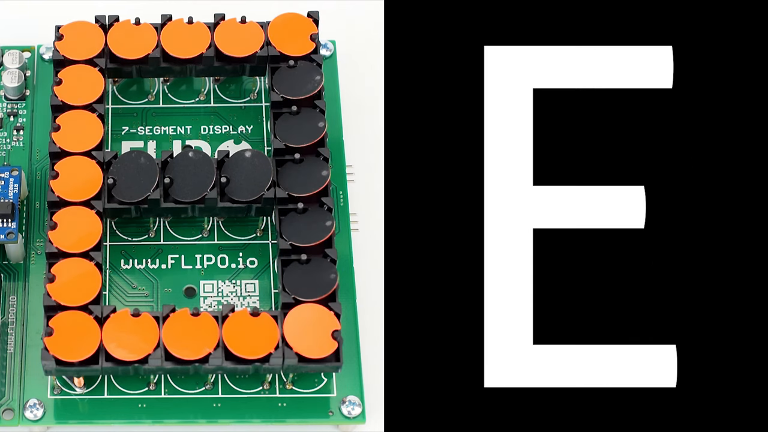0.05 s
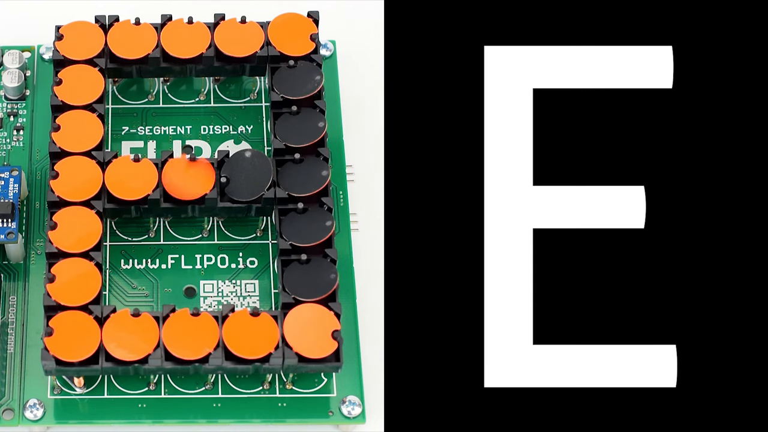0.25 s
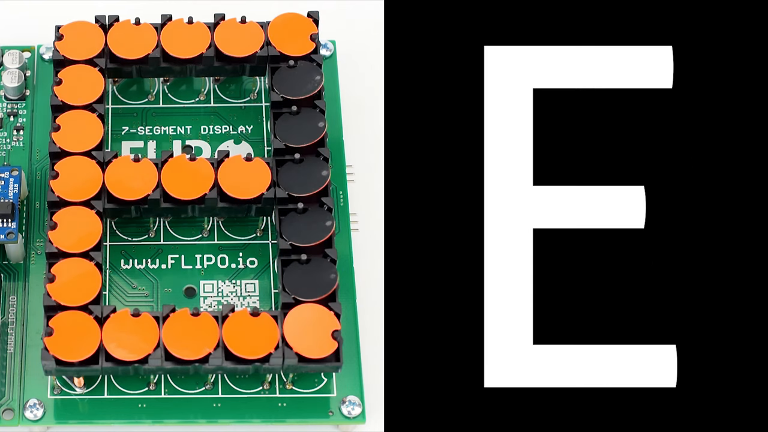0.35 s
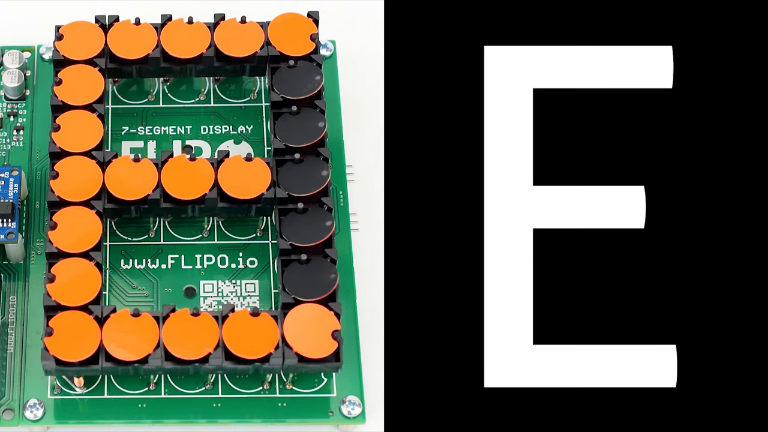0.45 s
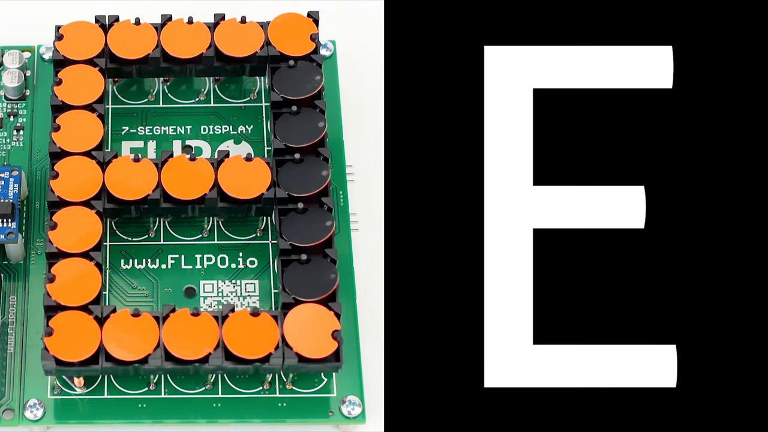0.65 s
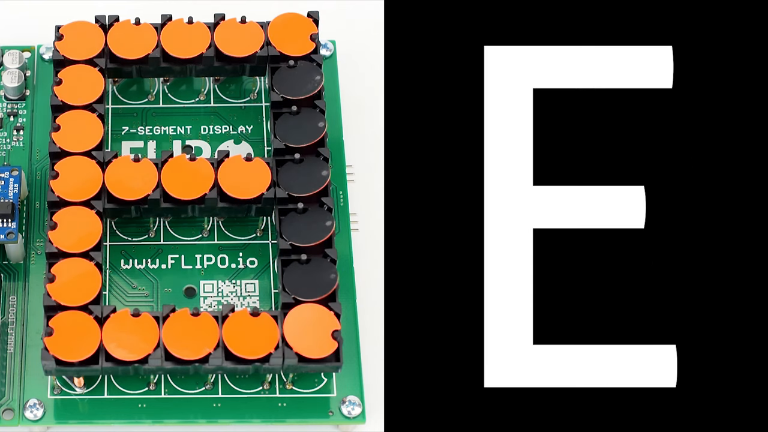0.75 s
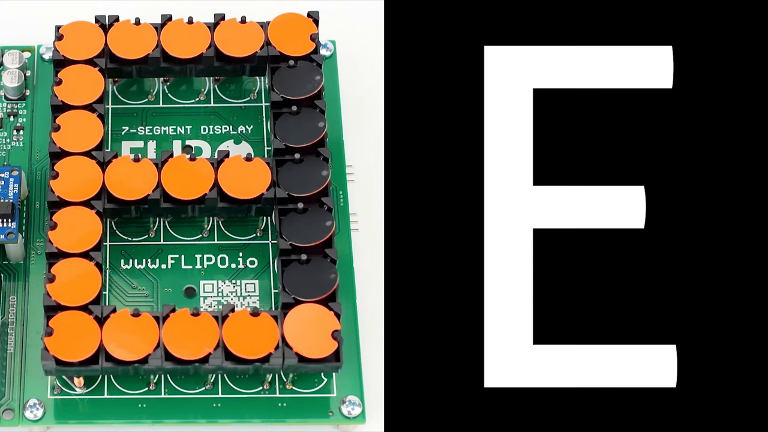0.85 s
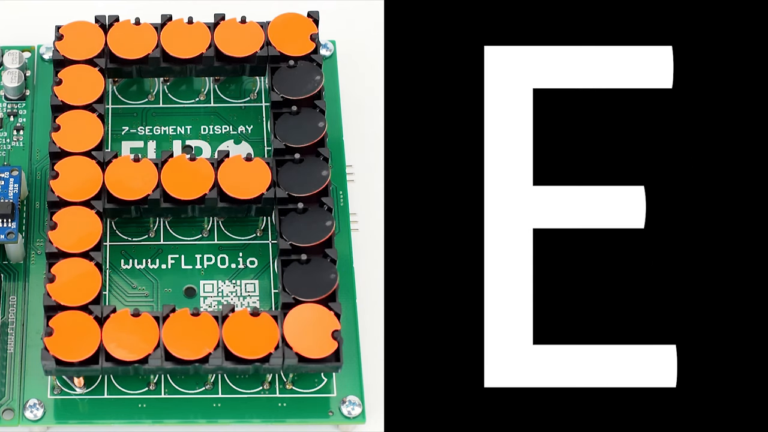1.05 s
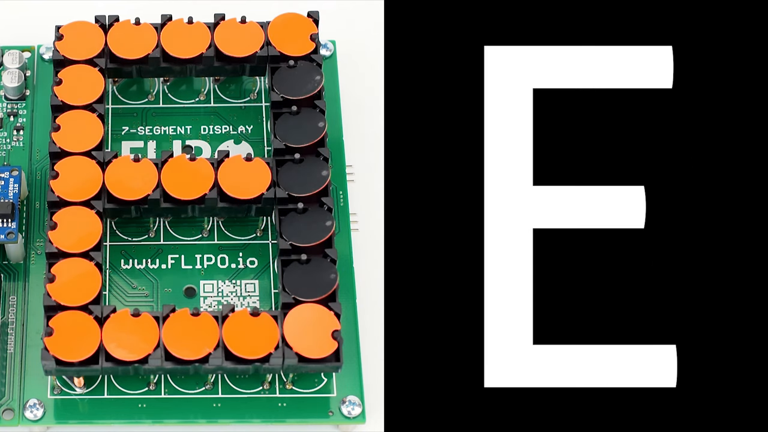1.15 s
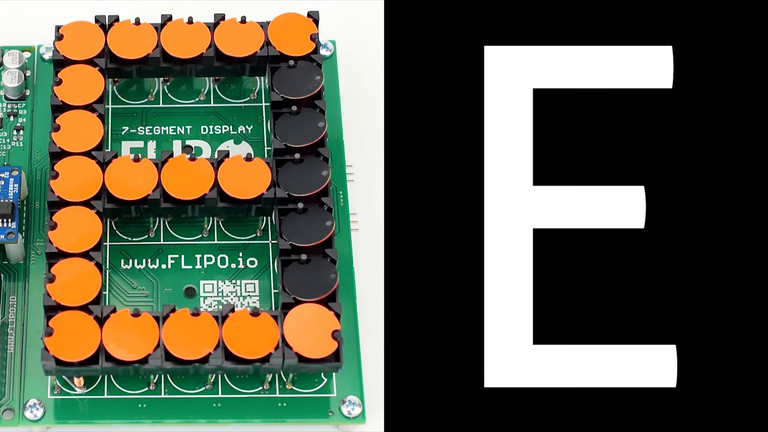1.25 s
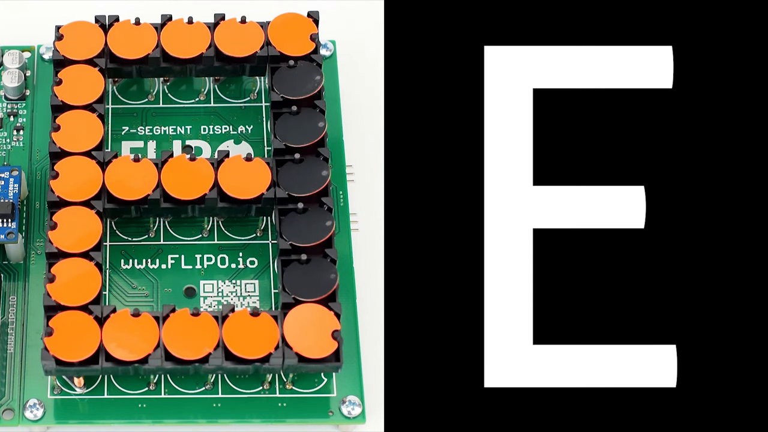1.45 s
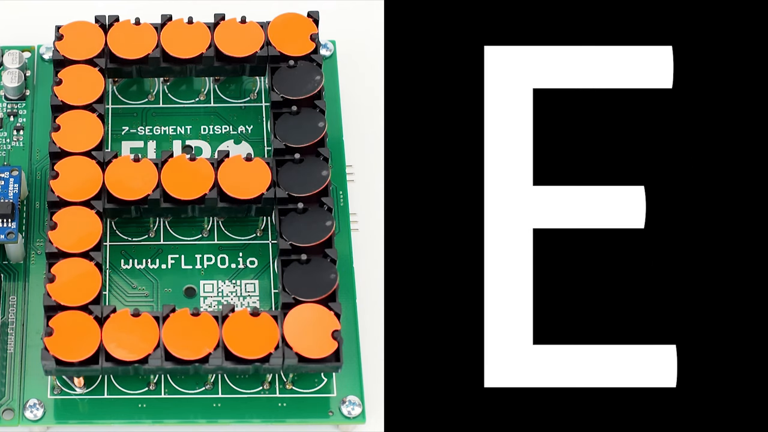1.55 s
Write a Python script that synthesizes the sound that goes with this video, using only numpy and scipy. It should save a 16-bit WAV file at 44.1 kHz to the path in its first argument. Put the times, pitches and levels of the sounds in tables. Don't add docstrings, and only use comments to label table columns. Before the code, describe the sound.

Close stereo pickup of light magnetic discs snapping against their stops, four quick clicks about a twentieth of a second apart, a short small-room reflection, then very soft hiss and faint electronic whine.

```python
import sys
import numpy as np
from scipy import signal
from scipy.io import wavfile

SR = 44100
rng = np.random.default_rng(int(sys.argv[2]) if len(sys.argv) > 2 else 0)


def amplitude_ratio(level_db):
    exponent = np.asarray(level_db, float) / 20
    return 10 ** exponent


def store_wav(level_fs):
    pcm = np.round(np.clip(np.atleast_2d(level_fs), -1, 1) * 32767)
    wavfile.write(sys.argv[1], SR, pcm.T.astype(np.int16))


N = 70560


def rms_one(x):
    return x / np.sqrt(np.mean(x ** 2) + 1e-20)


def at_hz(points, hz):
    table_hz, values = np.array(points).T
    return np.interp(np.log(hz), np.log(table_hz), values)


def ring(clicks, hz, width_hz):
    r, w = np.exp(-np.pi * width_hz / SR), 2 * np.pi * hz / SR
    return signal.lfilter([0, np.sin(w)], [1, -2 * r * np.cos(w), r * r], clicks + 1e-18)


def bands(length, colour, likeness, shape):
    out, edges = 0, 20 * 2 ** np.arange(0, 10, .5)
    settle = SR // 10
    white = rng.standard_normal((2, 2, length + settle))
    for k, (low, high) in enumerate(zip(edges, edges[1:])):
        sos = signal.butter(2, [low, min(high, .45 * SR)], "band", fs=SR, output="sos")
        mid, side = signal.sosfilt(sos, white[k % 2])[:, settle:]
        hz = np.sqrt(low * high)
        alike = np.clip(at_hz(likeness, hz), 0, 1)
        stereo = np.sqrt(1 + alike) * mid + np.sqrt(1 - alike) * side * [[1], [-1]]
        out = out + amplitude_ratio(at_hz(colour, hz)) * shape(hz) * stereo
    return out


def steep(x, hz):
    return signal.sosfilt(signal.cheby2(16, 60, hz, fs=SR, output="sos"), x)


# start in seconds, chatter length in seconds, chatter level in dB,
# board level in dB, disc ring level in dB.
FLIPS = [
    (0.2094, 0.0083, -50.5, -23, -6.5),
    (.2595, 0.0048, -32.5, -20.5, -9),
    (0.3086, .010, -38, -23, -4.5),
    (0.3605, 0.0051, -38, -18.5, -10),
    (1.4606, 0.011, -67.5, -18.5, -10),
    (1.512, 0.017, -71, -21, -6.5),
    (1.564, 0.019, -76.5, -19, -11),
]
# frequency in Hz, width in Hz, level in dB.
DISC_A = [(954, 290, -14.5), (1970, 220, -9), (3700, 130, -4.5), (7840, 320, 5), (8530, 430, 8),
          (9400, 180, -6.5), (10500, 210, -30), (13700, 420, -21)]
DISC_B = [(2100, 75, -16), (2351, 120, -3.5), (3705, 90, -9), (5260, 120, -4), (6030, 140, -11.5),
          (8690, 110, 2.5), (9300, 150, -6), (10770, 300, -12.5), (12000, 310, -22), (13430, 130, -26)]
DISC_C = [(1590, 180, -11.5), (2560, 300, -12), (4200, 230, -15), (7270, 110, -10.5), (7900, 200, -20.5),
          (8540, 120, 1), (9100, 96, -9.5), (10000, 270, -7), (12600, 110, -28), (14000, 140, -23)]
DISC_D = [(1040, 67, -17), (1680, 99, -6.5), (1937, 44, -5), (4240, 110, -7), (4680, 120, -12.5),
          (7590, 100, 4.5), (8740, 75, -2), (9020, 280, 3), (11050, 99, -6), (13300, 120, -28)]
DISC_FAR = [(1970, 170, -6.5), (3500, 200, -1), (4630, 300, -4), (7800, 310, -2), (8700, 340, -8)]
RING_IN_ROOM_DB, PAN_DB = -12, -.8
BODY_LOW_HZ, BODY_HIGH_HZ = 469, 11800


def discs():
    out = np.zeros((2, 2, N + SR))
    for row, disc in zip(FLIPS, [DISC_A, DISC_B, DISC_C, DISC_D, DISC_FAR, DISC_FAR, DISC_FAR]):
        first, rings, snaps = flip(row, disc)
        out[..., first:first + len(rings)] += [rings + snaps, amplitude_ratio(RING_IN_ROOM_DB) * rings + snaps]
    low_cut = signal.butter(6, BODY_LOW_HZ, "high", fs=SR, output="sos")
    high_cut = signal.butter(2, BODY_HIGH_HZ, fs=SR, output="sos")
    body = np.vstack([low_cut, high_cut])
    return signal.sosfilt(body, out[..., :N]) * amplitude_ratio([[PAN_DB / 2], [-PAN_DB / 2]])


def flip(row, disc):
    start, lasts, chatter_db, board_db, ring_db = row
    first = int(start * SR) - SR // 400
    clicks = touches(first, start, lasts, chatter_db)
    rings = disc_ring(clicks, disc, ring_db) + board_ring(clicks, board_db)
    return first, rings, snaps_of(clicks)


# time in seconds, level in dB.
TOUCHES = [(0.21, -41.5), (0.2103, -41), (0.2128, -37), (.2136, -45.5), (.2160, -38), (0.2326, -40.5),
           (0.2597, -34.5), (0.261, -25), (0.2624, -31), (0.264, -28.5), (0.2644, -41.5), (.2706, -33.5),
           (.2900, -42.5), (.3088, -27.5), (.3112, -36), (0.313, -23), (.3150, -26), (.3160, -24.5),
           (.3178, -31), (.3235, -37.5), (.3602, -23.5), (0.362, -27), (0.363, -32.5), (0.3655, -30.5),
           (.3714, -36), (.3846, -35), (0.3877, -38), (1.4612, -57), (1.462, -66), (1.5165, -69)]
CHATTER_PER_S, CHATTER_T60_S, CHATTER_SPREAD_DB = 2500, 0.024, 4


def touches(first, start, lasts, chatter_db):
    n = SR // 4
    t = (np.arange(n) + first) / SR - start
    fade_db = chatter_db - 60 * np.maximum(t - lasts, 0) / CHATTER_T60_S
    hits = (rng.random(n) < CHATTER_PER_S / SR) * (t > 0) * rng.choice([-1, 1], n)
    clicks = hits * amplitude_ratio(fade_db + CHATTER_SPREAD_DB * rng.standard_normal(n))
    for s, db in TOUCHES:
        if 0 <= s * SR - first < SR // 22:
            clicks[int(s * SR) - first] += amplitude_ratio(db)
    return clicks


WIDEN, MODE_SCATTER_DB = 2.2, 4


def disc_ring(clicks, disc, ring_db):
    out = 0
    for k, (hz, width, db) in enumerate(disc):
        scatter = amplitude_ratio(MODE_SCATTER_DB * rng.standard_normal(len(clicks)))
        out = out + amplitude_ratio(ring_db + db) * ring(clicks * scatter, hz, WIDEN * width) * (-1) ** k
    return out


# frequency in Hz, level in dB, t60 in seconds.
BOARD = [(486.5, -15.5, 0.13), (620.3, -25, .08), (885, -14.5, .12), (982, -22, 0.16), (1189, -15, .08),
         (1646, -12, 0.094), (1737, -13, 0.12), (1887, -8, .08), (1974, -7.5, 0.079), (2196, -16, 0.096),
         (2330, -10.5, 0.075), (3810, -16, 0.079), (7116, -16, .05), (8140, -16.5, .05)]


def board_ring(clicks, board_db):
    out = 0
    for hz, db, t60 in BOARD:
        level = amplitude_ratio(board_db + db + 2.1 * rng.standard_normal())
        out = out + level * ring(clicks, hz, np.log(1000) / np.pi / t60)
    return out


def snaps_of(clicks):
    dealt = rng.integers(0, 3, size=len(clicks))
    out = 0
    for k in range(3):
        out = out + signal.fftconvolve([clicks * (dealt == k)], snap(), axes=1)[:, :len(clicks)]
    return out


# frequency in Hz, level in dB per Hz.
SNAP = [(350, -37), (500, -21), (900, -13.5), (2000, -4.5), (4000, -6), (6000, -7), (8500, 0.5),
        (15000, -21)]
# frequency in Hz, likeness from 0 to 1.
SNAP_ALIKE = [(1000, 1), (4000, 0.94), (8000, 0.9), (13000, .4)]
SNAP_DB, SNAP_T60_S, SNAP_CYCLES = 5.5, .004, 14


def snap():
    t = np.arange(SR // 50) / SR
    crack = bands(len(t), SNAP, SNAP_ALIKE, lambda hz: amplitude_ratio(-60 * t / (SNAP_T60_S + SNAP_CYCLES / hz)))
    return amplitude_ratio(SNAP_DB) * crack / np.sqrt(np.sum(crack ** 2) / 2)


THUMP_S, THUMP_HZ, THUMP_WIDTH_HZ, THUMP_DB = 0.43, 154, 29, -74


def thump():
    nudge = 1. * (np.arange(N) == int(THUMP_S * SR))
    return amplitude_ratio(THUMP_DB) * ring(nudge, THUMP_HZ, THUMP_WIDTH_HZ)


# frequency in Hz, t60 in seconds.
ROOM_T60 = [(400, 0.3), (1000, 0.25), (2500, 0.21), (6000, 0.19), (9000, .17), (13000, 0.09)]
# frequency in Hz, likeness from 0 to 1.
ROOM_ALIKE = [(400, 1), (2000, 1), (6000, 0.5), (14000, .3)]
ROOM_DB, WALL_S, WALL_DB, WALL_SMEAR_S = -6.5, 0.017, 5, .012


def room(x):
    t = np.arange(SR // 3) / SR
    wall = 1 + (amplitude_ratio(WALL_DB) - 1) * (t > WALL_S) * np.exp(-np.maximum(t - WALL_S, 0) / WALL_SMEAR_S)
    tail = bands(len(t), [(20, 0), (2e4, 0.0019)], ROOM_ALIKE,
                 lambda hz: wall * amplitude_ratio(-60 * t / at_hz(ROOM_T60, hz)))
    tail = tail * np.minimum(t / 0.0025, 1)
    return amplitude_ratio(ROOM_DB) * signal.fftconvolve(x, tail / np.sqrt(np.sum(tail ** 2) / 2), axes=1)[:, :N]


# frequency in Hz, rms level in dB.
WHINE = [(5030, -93.5), (5095, -94.5)]
THROB_HZ, THROB_PHASE, THROB_DEPTH = 18, -.7, 1
WHINE_WANDER = .03


def whine():
    t = np.arange(N) / SR
    throb = 1 + THROB_DEPTH * np.cos(2 * np.pi * THROB_HZ * t + THROB_PHASE)
    out = 0
    for hz, db in WHINE:
        wander = WHINE_WANDER * np.cumsum(rng.standard_normal(N))
        out = out + amplitude_ratio(db + 2.5) * np.sin(2 * np.pi * hz * t + wander)
    return throb * out


# frequency in Hz, width in Hz, rms level in dB.
HUM = [(911, 8, -92), (993, 4.5, -88), (1334, 8, -95)]


def hum():
    out = 0
    for hz, width, db in HUM:
        line = ring(ring(rng.standard_normal(2 * N), hz, width), hz, width)
        out = out + amplitude_ratio(db) * rms_one(line[N:])
    return out


# frequency in Hz, level in dB per Hz.
HISS = [(12, -34), (20, -6.5), (32, -21.5), (115, -23), (245, -28.5), (967, -21), (1050, -21), (5140, -29),
        (12500, -41.5), (16200, -74), (22000, -120)]
# frequency in Hz, likeness from 0 to 1.
LIKENESS = [(60, 0.57), (130, 0.45), (290, 0.87), (640, 0.63), (1410, 0.29), (3100, 0.16), (6820, 0.11),
            (15000, 0.07)]
HISS_DB, HISS_TOP_HZ = -73, 13250


def background():
    hiss = amplitude_ratio(HISS_DB) * rms_one(bands(N, HISS, LIKENESS, lambda hz: 1))
    return steep(hiss + hum() + whine(), HISS_TOP_HZ)


def scene():
    dry, sent = discs()
    return dry + room(sent) + thump() + background()


def top_cut(x):
    return signal.sosfilt(signal.butter(12, 16340, fs=SR, output="sos"), x)


TOP_HZ, OFFSET = 16300, -.00069


def record(dry):
    mix = steep(dry, TOP_HZ) + OFFSET
    return top_cut(mix)


dry = scene()
out = record(dry)
store_wav(out)
```